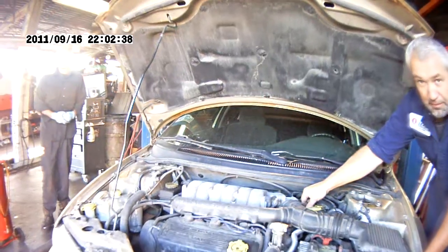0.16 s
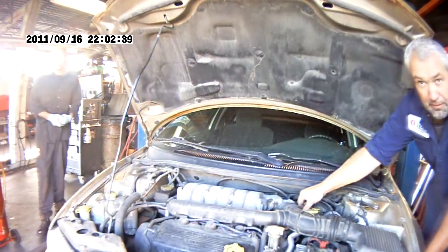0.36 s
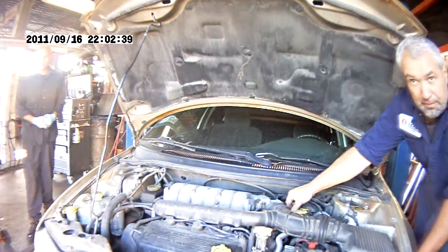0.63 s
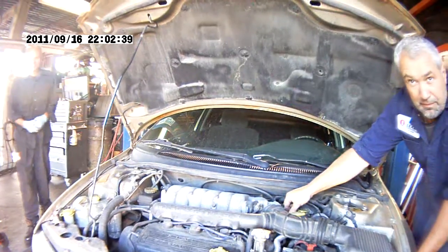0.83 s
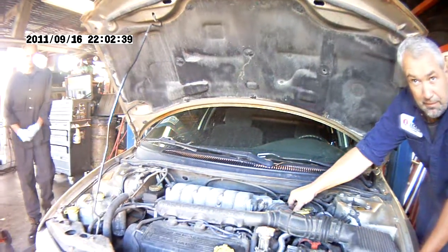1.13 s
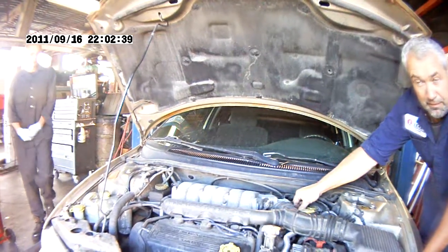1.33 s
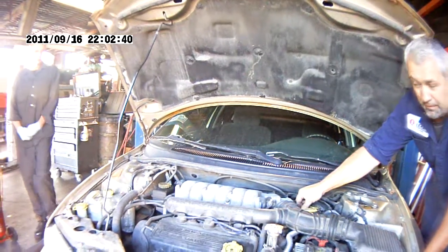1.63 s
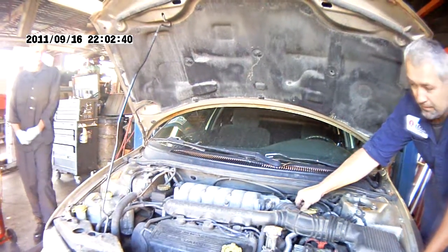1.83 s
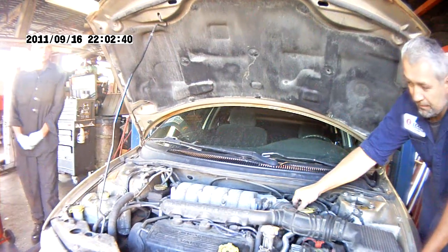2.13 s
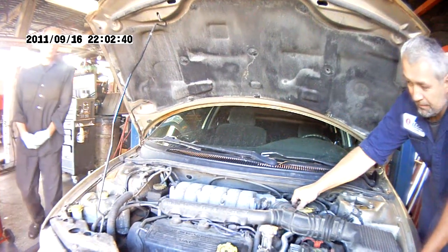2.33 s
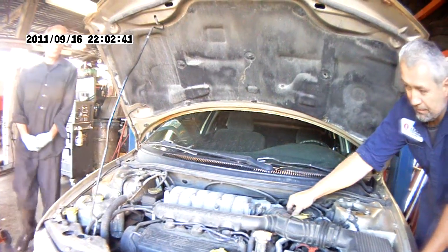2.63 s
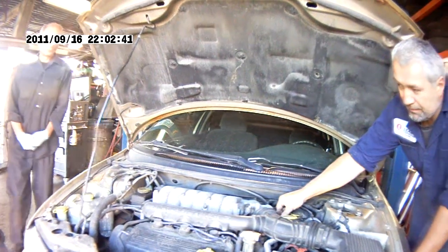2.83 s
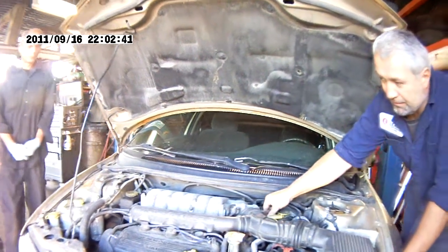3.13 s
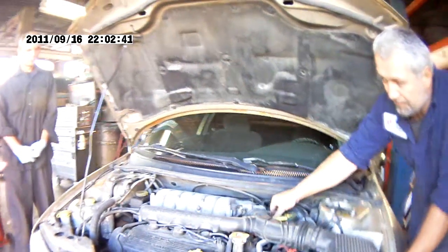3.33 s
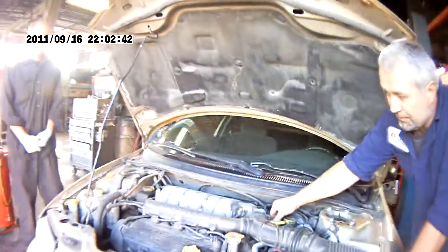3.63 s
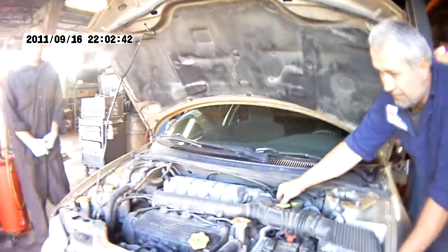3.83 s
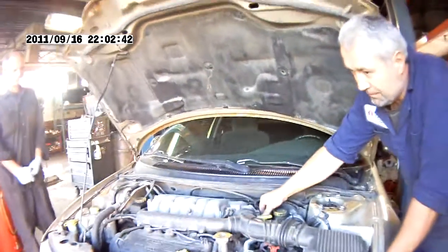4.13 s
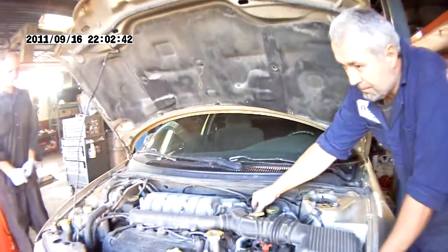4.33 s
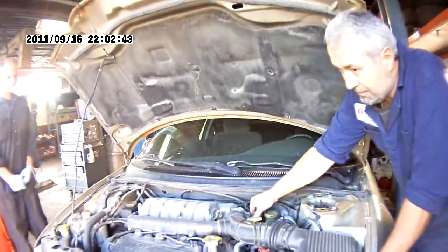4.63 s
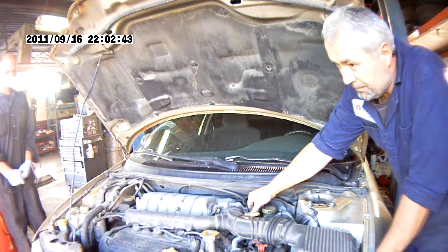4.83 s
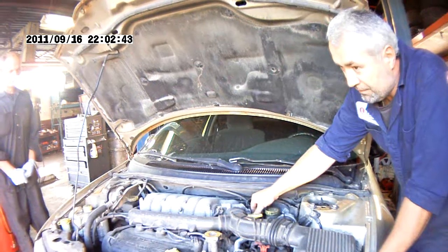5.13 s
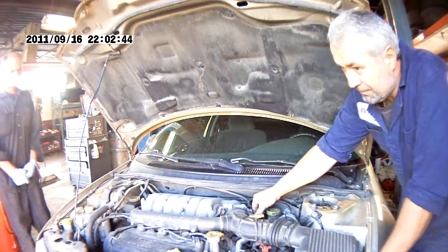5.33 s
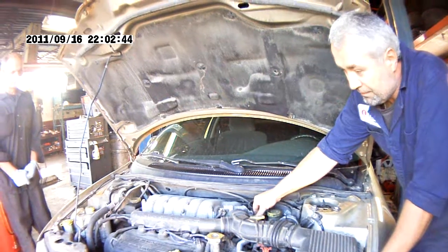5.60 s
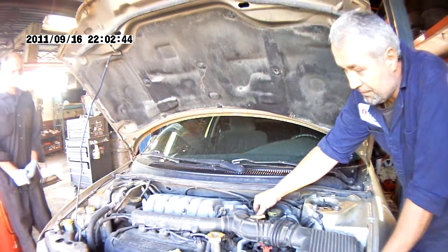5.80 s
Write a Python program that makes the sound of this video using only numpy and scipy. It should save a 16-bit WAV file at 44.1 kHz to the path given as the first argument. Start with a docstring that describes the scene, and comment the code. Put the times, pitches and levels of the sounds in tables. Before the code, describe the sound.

A six-cylinder car engine idles in a workshop, its valve gear ticking and knocking unevenly. After about a second and a half the throttle opens, speed more than doubles within a second and a half, and the clatter becomes a fast, loud, metallic rattle with intake hiss and a singing whine. It holds to the end. Close handheld microphone, treble slightly grainy.

```python
"""Six-cylinder engine, throttle opened

A six-cylinder engine idles with its hood up, then a hand opens the throttle and the speed more than doubles.
Valve gear and chain strike the same blows on every cam turn; block modes ring, echo loops smear the blows.
Noise through the high modes is the intake hiss; tones locked to the cam sing as they meet resonances.
A soft bump is a short low cosine; the workshop is shaped noise with a steady mains tone."""
import sys
import numpy as np
from scipy import signal
from scipy.fft import rfft, irfft
from scipy.io import wavfile
from scipy.ndimage import uniform_filter1d, map_coordinates

SR = 44100
rng = np.random.default_rng(int(sys.argv[2]) if len(sys.argv) > 2 else 0)


def undo_db(level):
    """Turn decibels back into plain size, where 20 dB means ten times bigger."""
    steps = np.asarray(level, float) / 20
    return 10 ** steps


def master_out(mix):
    """Clip the mix to full scale and print it as 16-bit PCM to the path in sys.argv[1]."""
    frames = np.transpose(np.atleast_2d(mix))
    ceiling = np.clip(frames, -1, 1)
    pcm = np.round(ceiling * 32767).astype(np.int16)
    wavfile.write(sys.argv[1], SR, pcm)


N = 262836
T = np.arange(N) / SR  # s

# cam speed: idle, climb as the throttle opens, slight sag, late creep upward [t/s, speed/(turns/s)]
CAM_SPEED = [(0.0, 7.94), (0.6, 7.94), (1.2, 7.85), (1.39, 7.86), (1.84, 11.0), (2.21, 13.55), (2.52, 15.9),
             (2.75, 16.9), (2.9, 17.25), (3.15, 17.48), (3.4, 17.46), (4.0, 17.37), (4.9, 17.44),
             (5.26, 17.6), (5.66, 17.9), (5.96, 18.02)]
# largest blows of one cam turn [place/turns, dull knock level/dB, bright tick level/dB], levels relative
VALVE_BLOWS = [(0.109, -6.5, -18), (.17, 19, 18.5), (.32, -28, 15.5), (.35, -5, 18), (.44, 0, 22),
               (.63, 23, 11), (.68, 21, 11), (.85, -3, 20.5), (.88, 8, 6), (0.969, -7, 11)]
# resonances of block and covers [f/Hz, width/Hz, relative level/dB]
BLOCK_MODES = [(499.5, 2.7, -16), (543.5, 30, -18), (686, 36, -14.5), (735, 40, -14.5), (830.3, 21.4, -10),
               (906, 39.5, -9), (974, 35, -6.5), (1038.4, 16.5, -3.5), (1100, 41, -7), (1205, 42, -6),
               (1312, 63, -4.5), (1407.7, 33.7, 4), (1504, 54, -2), (1609, 96, -3.5), (1697, 29, -3),
               (1771, 47, -3), (1948, 218, -9), (2350, 26, -20.5), (2894, 246, -18), (3410, 107, -17),
               (4217, 307, -9.5), (4530, 206, -8), (4987, 517, -10.5), (5760, 740, -10), (6580, 532, -12.5),
               (7810, 1300, -22), (9540, 490, -24), (10700, 440, -24)]
# echo loops of engine bay and hood [delay/s, feedback before its limit of 0-0.8]
BAY_LOOPS = [(.0031, 3.4), (.0047, 0.23), (.0079, .5), (0.013, 0.41), (.0223, 0.7)]
# cam-locked tones; orders are rounded to whole numbers; 76, 79 and 82 beat at the firing rate of one bank
# [order/(cycles/turn), rms level at resonance before waver and lulls/dB, resonance f/Hz, width/Hz]
CAM_TONES = [(27, -66.5, 481, 12.5), (33, -67.5, 574, 9.6), (42, -65.5, 753, 28), (47, -64.5, 819, 12),
             (51, -61, 912, 7.2), (56, -67, 973, 13), (58, -56, 1043, 10), (59, -63, 1032, 21),
             (60, -64.5, 1042, 12), (62, -62, 1080, 14), (67, -57.5, 1203, 15), (76, -50.5, 1348, 26),
             (79, -45.5, 1400, 28), (82, -52, 1434, 34), (102, -52, 1785, 20), (102.5, -56, 1815, 12),
             (111, -62, 1932, 10), (114, -77, 1983, 13)]
# level laws before lulls and treble dropouts
# [idle level/dB, gain held/dB, gain under load/dB, gain at top speed/dB]
KNOCK_LAW = (-52.5, 10, 1.5, -1.3)
TICK_LAW = (-52, 8.5, 0.8, 1.5)
TREBLE_LAW = (-52, 11, 1, 0.5)
# quiet gap ahead of the valve work of each cylinder [depth/(0-1) before the speed-dependent share]
LULL_DEPTHS = [0.71, 0.083, 0.3, 0.18, 0.33, 0.17]
# soft bump on the microphone [t/s, peak level/dB, f/Hz]
BUMPS = [(4.0, -56, 95)]
# workshop rumble spectrum [f/Hz, relative level/dB per Hz]
RUMBLE_SPECTRUM = [(12, -30), (20, 3), (168, -9), (201, -7), (233, -6.5), (270, -10), (462, -6.5),
                   (700, -4.5), (910, -10), (1540, -120)]
# steady mains tone [f/Hz, rms level/dB]
MAINS_TONES = [(240, -78.5)]

IDLE_PER_S, HELD_PER_S, TOP_PER_S = 8, 17.4, 18  # cam turns/s
CLIMB_PER_S2 = 7  # about the fastest rise, cam turns/s^2
LULL_PLACE_TURNS, LULL_HALF_WIDTH_TURNS = 0.077, 0.024
WAVER_DB, WAVER_KNOTS_PER_S = 0.5, 2.24  # slow swell and fade of each tone
SING_PLACE_TURNS = 0.3  # all tones are in phase here
COVER_GAIN = 0.37  # extra valve cover ring near 3 kHz at held speed
THIN_HELD = 0.19  # share lost by the modes at 650-1260 Hz at held speed
# modes at 1260-1450 Hz give way to the whine near one cam speed
WHINE_LOSS, WHINE_PER_S, WHINE_REL_WIDTH = 0.55, 17.75, 0.014
RUMBLE_RMS_DB = -67.5


def engine():
    """Knocks ring the low modes, ticks and air hiss the high ones; levels follow speed and load."""
    speed = cam_speed()
    rev = np.interp(speed, [IDLE_PER_S, HELD_PER_S], [0, 1])
    top = np.interp(speed, [HELD_PER_S, TOP_PER_S], [0, 1])
    load = uniform_filter1d(np.gradient(speed) * SR, size=SR // 4) / CLIMB_PER_S2
    knock_db, tick_db, treble_db = (
        idle_db + held_db * rev + load_db * load + top_db * top
        for idle_db, held_db, load_db, top_db in (KNOCK_LAW, TICK_LAW, TREBLE_LAW))
    _, dull_db, bright_db = np.transpose(VALVE_BLOWS)

    # parts run loosely at idle, in step at speed
    loose = undo_db(-6 - 7 * rev) * rng.standard_normal(N)
    low = levelled(rattle(dull_db, 3.0, 2.5e-5, 4e-5)) * undo_db(-7.0 - 4.4 * rev)
    low = low + undo_db(-11.0 + 0.78 * rev) * grind(1.0)
    low = bay(low, 0.79) + loose

    hiss = rng.standard_normal(N)
    high = levelled(rattle(bright_db, 8.0, 1.6e-5, 3e-5))
    high = high + undo_db(-2.3 * rev) * spray(bright_db, 0.0028)
    high = bay(high, 0.63)

    knocks = ring(low, 0, 2200)
    knocks = knocks + 1.04 * load * ring(low, 450, 650)  # the intake booms under load
    knocks = knocks - THIN_HELD * rev * ring(low, 650, 1260)
    whine = nearness(speed, WHINE_PER_S, WHINE_REL_WIDTH)
    knocks = knocks - WHINE_LOSS * whine * ring(low, 1260, 1450)
    ticks = ring(high + undo_db(2.2 * rev) * hiss, 2200, 4800)
    ticks = ticks + COVER_GAIN * rev * ring(high + hiss, 2600, 3100)
    treble = ring(high + undo_db(-1.5 + 2.6 * rev) * hiss, 4800, 12000)

    gaps = lulls(1 - 0.7 * rev)
    dull_ring = np.sqrt(gaps) * (undo_db(knock_db) * levelled(knocks) + singing())
    bright_ring = undo_db(tick_db) * levelled(ticks) + undo_db(treble_db) * levelled(treble)
    return dull_ring + treble_dropouts(bright_ring * gaps, 27)


def cam_speed():
    """Cam speed in turns/s, linear between the table points."""
    return np.interp(T, *np.transpose(CAM_SPEED))


def cam_turns():
    """Turns of the camshaft since the start: the running integral of its speed."""
    return np.cumsum(cam_speed()) / SR


def rattle(blow_db, small_db, jitter_s, slip_s):
    """Large valve blows over many small chain and lifter taps of either sign."""
    taps = rng.random((2, 90, 2))  # sign, tap, (place, weakness)
    large = strike(np.transpose(VALVE_BLOWS)[0], blow_db, jitter_s, 5.7, slip_s)
    push, pull = (strike(p[:, 0], small_db - 9 * p[:, 1], jitter_s, 1.08, slip_s) for p in taps)
    return large + push - pull


def strike(place_turns, db, jitter_s, wander_db, slip_s):
    """The same impulses every turn, each a little early or late, drifting in force and place."""
    turns = cam_turns()
    count = len(place_turns)
    due = np.arange(-1, int(turns[-1]) + 1)[:, None] + place_turns
    at_s = np.interp(due, turns, T, left=0, right=T[-1])
    slow = (at_s * SR / N * 99).astype(int), np.arange(count)
    at_s = at_s + jitter_s * rng.standard_normal(at_s.shape)
    at_s = at_s + slip_s * drift(1.443, count).T[slow]
    inside = (at_s > 1e-3) & (at_s < T[-1] - 1e-3)
    force = undo_db(db + wander_db * drift(2.27, count).T[slow]) * inside
    fine = np.clip(np.round(4 * at_s * SR).astype(int), 0, 4 * N - 1)  # quarter-sample grid
    impulses = np.bincount(fine.ravel(), force.ravel(), minlength=4 * N)
    return signal.resample_poly(impulses, up=1, down=4)


def grind(change_rad):
    """Chain and bearings repeat a dense pattern every turn; it drifts between two patterns."""
    spectra = np.exp(2j * np.pi * rng.random((2, 2049))) * (np.arange(2049) < 400)
    place = cam_turns() % 1
    first, second = (map_coordinates(p, [place * len(p)], order=3, mode="grid-wrap")
                     for p in irfft(spectra))
    blend_rad = change_rad * np.interp(T, np.linspace(0, T[-1], 100), drift(1.2, count=1)[0])
    return evened(np.cos(blend_rad) * first + np.sin(blend_rad) * second)


def spray(blow_db, decay_s):
    """Each valve blow gates a short noise burst, a chatter that never repeats exactly."""
    blows = abs(strike(np.transpose(VALVE_BLOWS)[0], blow_db, 0.00042, 4.2, 3e-4))
    t = np.arange(1024) / SR
    shape = np.exp(-t / decay_s) * np.minimum(t / 0.00065, 1)
    return levelled(signal.oaconvolve(blows, shape)[:N] * rng.standard_normal(N))


def bay(x, wet):
    """Engine bay and hood: all-pass echo loops smear each blow, mixed with the direct sound."""
    delay_s, feedback = np.transpose(BAY_LOOPS)
    lag = np.exp(-2j * np.pi * np.outer(np.fft.rfftfreq(16384, 1 / SR), delay_s))
    back = np.clip(feedback, 0, 0.8)
    loops = np.prod((back + lag) / (1 + back * lag), axis=1)
    return (1 - wet) * x + wet * signal.oaconvolve(x, irfft(loops))[:N]


def ring(x, lo_hz, hi_hz):
    """Block modes between two limits as decaying sines; neighbours swing in opposite sense."""
    t = np.arange(2048) / SR
    modes = np.zeros(len(t))
    for k, (hz, width_hz, db) in enumerate(BLOCK_MODES):
        if lo_hz < hz < hi_hz:
            decay = np.exp(-np.pi * width_hz * t)
            modes += (-1) ** k * undo_db(db) * width_hz * decay * np.sin(2 * np.pi * hz * t)
    lead_in = x[len(t):0:-1]  # already ringing at the start
    return signal.oaconvolve(np.r_[lead_in, x], modes)[len(t):len(t) + N]


def singing():
    """Clean tones locked to the cam speed, loudest where each meets its resonance."""
    turns, speed = cam_turns() - SING_PLACE_TURNS, cam_speed()
    wavers = drift(WAVER_KNOTS_PER_S, count=len(CAM_TONES))
    tones = np.zeros(N)
    for (order, db, hz, width_hz), waver in zip(CAM_TONES, wavers):
        order = round(order)
        waver_db = WAVER_DB * np.interp(T, np.linspace(0, T[-1], len(waver)), waver)
        gain = np.sqrt(2) * undo_db(db + waver_db) * nearness(order * speed, hz, width_hz / hz)
        tones += gain * np.cos(2 * np.pi * order * turns)
    return tones


def nearness(rate, centre, rel_width):
    """Resonance curve: 1 where the rate meets the centre, half at half the width away."""
    return 1 / (1 + (2 * (rate / centre - 1) / rel_width) ** 2)


def lulls(share):
    """Gain that dips between the blows; at speed the ringing fills the gaps."""
    turns = cam_turns() - LULL_PLACE_TURNS
    dips = np.zeros(N)
    for k, depth in enumerate(LULL_DEPTHS):
        offset = (turns - k / len(LULL_DEPTHS) + 0.5) % 1 - 0.5
        dips += depth * np.exp(-(offset / LULL_HALF_WIDTH_TURNS) ** 2)
    return 1 - share * dips


def treble_dropouts(x, depth_db):
    """Brief random holes in the treble, in patches of a few ms, deeper toward 9 kHz."""
    hz, _, z = signal.stft(x, SR, nperseg=128)
    patches = uniform_filter1d(rng.standard_normal(z.shape), size=4, axis=0)
    patches = evened(uniform_filter1d(patches, size=4, axis=1))
    holes_db = -depth_db * np.maximum(patches - 1.1, 0) * np.clip(hz / 9000, 0, 1)[:, None]
    return signal.istft(z * undo_db(holes_db), SR, nperseg=128)[1][:N]


def thump():
    """One low swing of the microphone membrane: a cosine in a Gaussian envelope."""
    return sum(undo_db(db) * np.cos(2 * np.pi * hz * (T - s)) * np.exp(-((T - s) / 0.006) ** 2)
               for s, db, hz in BUMPS)


def workshop():
    """Low rumble, noise of uneven loudness shaped in frequency, and a mains tone."""
    hz = np.fft.rfftfreq(N, 1 / SR)
    lumps = undo_db(2.1 * evened(uniform_filter1d(rng.standard_normal(N), 3000)))
    spectrum = rfft(lumps * rng.standard_normal(N)) * undo_db(read(RUMBLE_SPECTRUM, hz))
    rumble = undo_db(RUMBLE_RMS_DB) * evened(irfft(spectrum, N))
    mains = sum(np.sqrt(2) * undo_db(db) * np.sin(2 * np.pi * f * T) for f, db in MAINS_TONES)
    return rumble + mains


def evened(x):
    """Scales to rms 1."""
    return x / np.sqrt(np.mean(x ** 2) + 1e-20)


def levelled(x):
    """Keeps the half-second loudness near rms 1."""
    return x / np.sqrt(abs(uniform_filter1d(x ** 2, size=SR // 2)) + 1e-20)


def read(points, hz):
    """Reads a spectrum on a log-frequency axis."""
    f, value = np.transpose(points)
    return np.interp(np.log(hz + 1), np.log(f + 1), value)


def drift(knots_per_s, count):
    """Slow random curves of about rms 1, one a row, 100 points each: splines through random knots."""
    knots = rng.standard_normal((count, 64))
    place = np.arange(100) / 100 * N / SR * knots_per_s
    grid = np.meshgrid(np.arange(count), place, indexing="ij")
    return map_coordinates(knots, grid, order=3, mode="mirror")


def scene():
    """Engine and bump in front of the workshop."""
    return (engine() + thump() + workshop())[None]


def low_pass(x):
    """Removes everything above the highest recorded frequency."""
    return signal.sosfilt(signal.butter(12, 11120, fs=SR, output="sos"), x)


def record(dry):
    """Returns the finished mix as heard."""
    return low_pass(dry)


dry = scene()
out = record(dry)
master_out(out)
```